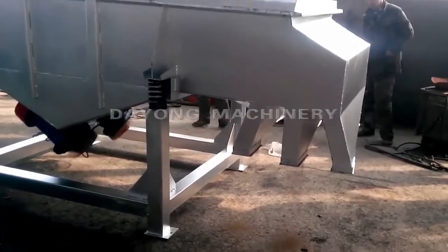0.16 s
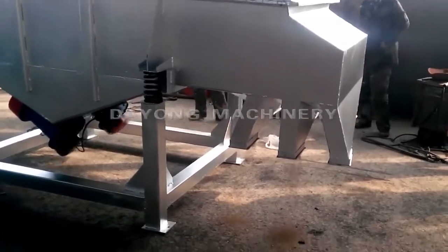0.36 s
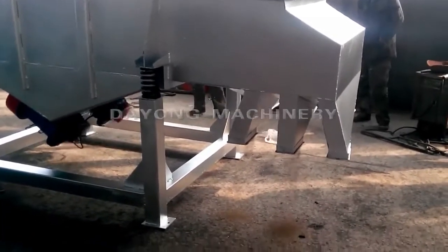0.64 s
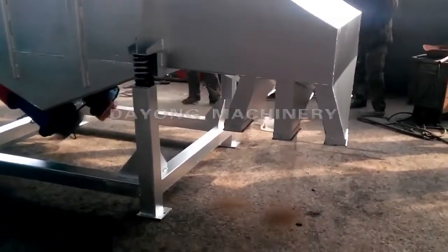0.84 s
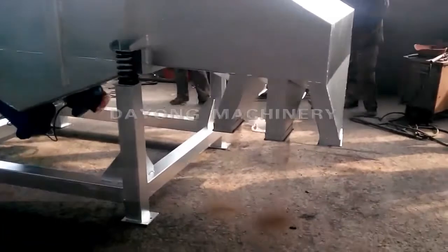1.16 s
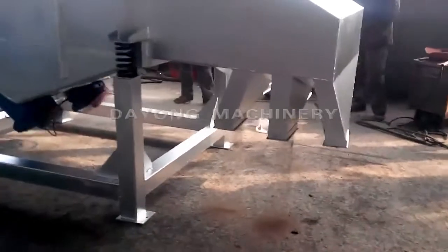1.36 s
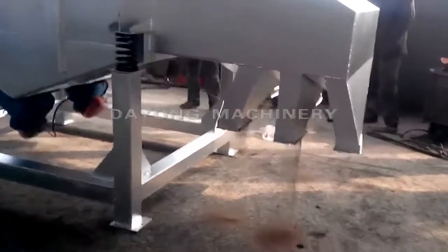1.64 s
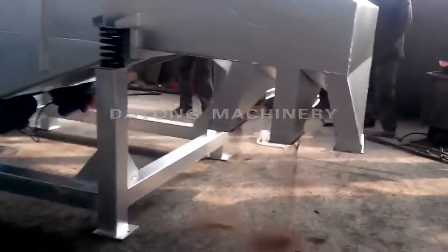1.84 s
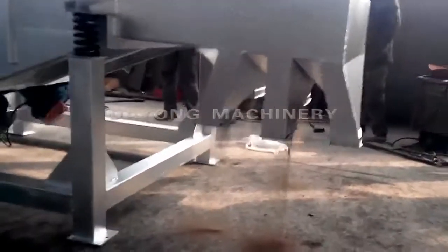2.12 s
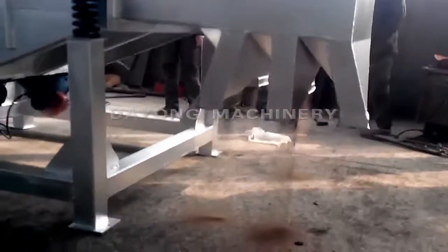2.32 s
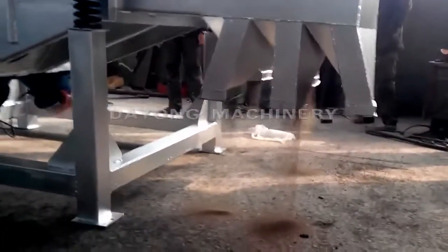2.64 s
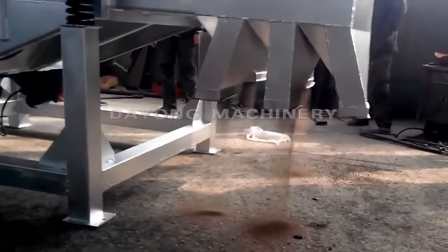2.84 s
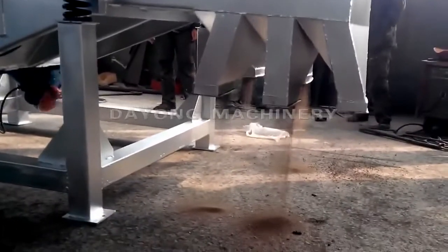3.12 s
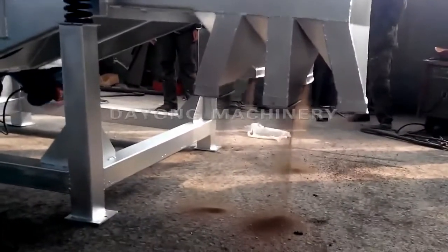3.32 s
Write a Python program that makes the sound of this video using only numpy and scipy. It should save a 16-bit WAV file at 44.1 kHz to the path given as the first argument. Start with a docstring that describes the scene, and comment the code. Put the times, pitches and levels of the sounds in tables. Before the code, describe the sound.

A large vibrating screen runs continuously in a workshop, grit hissing and rattling on its mesh over a deep throbbing hum; a hand-held phone moves closer, bass grows, and two tiny clicks come late.

```python
"""Grit rattles on the mesh of a large vibrating screen in a workshop: dense random hits and a wash of noise.
Its upper bands swell at each turn of the shaft, when the deck throws the grit up, and its level surges with the
load. Behind it the shaken steel box hums on multiples of the turn and rumbles as filtered noise, with narrow
motor bands. A hand-held phone walks slowly closer, heard as growing bass; two tiny clicks sound near the end."""
import sys
import numpy as np
from scipy import signal
from scipy.fft import rfft, irfft
from scipy.io import wavfile
from scipy.ndimage import uniform_filter1d

SR = 44100
rng = np.random.default_rng(int(sys.argv[2]) if len(sys.argv) > 2 else 0)


def gain_from_db(level_db):
    """Convert decibel levels to linear amplitude factors (20 dB per decade)."""
    decades = np.asarray(level_db, float) / 20
    return 10 ** decades


def store_pcm(level_fs):
    """Save levels as 16-bit WAV."""
    pcm = np.round(np.clip(level_fs, -1, 1) * 32767).astype(np.int16)
    wavfile.write(sys.argv[1], SR, np.atleast_2d(pcm).T)


N = 153468  # length in samples, about 3.5 s


def unit(x):
    """Scale to rms 1."""
    return x / np.sqrt(np.mean(x ** 2))


def bin_hz():
    """Frequency of every FFT bin in Hz."""
    return np.arange(N // 2 + 1) * SR / N


def over_hz(table):
    """Read a table of (Hz, value) at every FFT bin, along a logarithmic frequency scale."""
    table = np.array(table, float)
    return np.interp(np.log(bin_hz() + 1), np.log(table[:, 0]), table[:, 1])


def over_s(table, column=1):
    """Read one column of a table that starts with seconds, at every sample."""
    table = np.array(table, float)
    return np.interp(np.arange(N) / SR, table[:, 0], table[:, column])


def walk(rate_hz):
    """A smooth random drift with a spread near 1: new random levels at this rate, smoothed twice."""
    hold = int(SR / rate_hz)
    steps = np.repeat(rng.standard_normal(N // hold + 1), hold)
    smooth = uniform_filter1d(uniform_filter1d(steps, hold), hold)
    return 1.24 * smooth[:N]


def lowpass(x, hz):
    """Keep what lies below a frequency, without delaying it."""
    return signal.sosfiltfilt(signal.butter(2, hz, fs=SR, output="sos"), x)


# How different the two microphone ports sound.
# Each row: frequency in Hz, level of the side (left minus right) against the mid (their sum) in dB.
SIDE_WIDTH = [(60, -44), (180, -34.5), (320, -25.5), (560, -16.5), (700, -11.5), (800, -16.5), (970, -6),
              (1200, -10.5), (1900, -11), (2400, -9), (2970, -6.5), (5180, 0), (6400, 5), (9040, 5.5)]
# Which port is louder. Each row: frequency in Hz, left level minus right level in dB.
LEFT_LEAN = [(320, 0), (560, -.3), (970, -1.5), (1700, -.5), (2970, -3), (5180, -4.2), (6000, -3.5),
             (7000, 0)]


def ports(shared, apart, gain):
    """Colour two noises into left and right: one is common to both ports, one sets them apart; mid has rms 1."""
    left_late_s = 1e-5
    width = gain_from_db(over_hz(SIDE_WIDTH))
    # the part of the side that follows the mid: its real part makes one port louder
    lean = np.tanh(over_hz(LEFT_LEAN) * np.log(10) / 20) * (1 + width ** 2) / 2
    # its imaginary part makes the left port late
    lean = lean - 1j * np.minimum(np.pi * bin_hz() * left_late_s, width / 2)
    rest = np.sqrt(np.maximum(width ** 2 - np.abs(lean) ** 2, 0))
    mid_spectrum = rfft(shared) * gain
    side = irfft(lean * mid_spectrum + rest * rfft(apart) * gain, N)
    mid = irfft(mid_spectrum, N)
    return np.array([mid + side, mid - side]) / np.sqrt(np.mean(mid ** 2))


# Two tiny clicks. Each row: time in seconds, peak of left and right added together in dB, share on the left
# from 0 to 1.
TINY_CLICKS = [(2.4914, -19, .5), (3.0138, -24, .01)]


def clicks():
    """Two tiny clicks: each is a single sample, shared out between left and right."""
    out = np.zeros((2, N))
    for start_s, peak_db, left in TINY_CLICKS:
        out[:, int(start_s * SR)] = gain_from_db(peak_db) * np.array([left, 1 - left])
    return out


# Narrow bands of the motors. Each row: centre in Hz, width at half amplitude in Hz, rms level in dB.
MOTOR_TONES = [(127.6, 2.5, -35.5), (956.8, 14, -43), (533, 3.3, -46.5)]


def motors():
    """Bearing and rotor tones, blurred into narrow bands: noise through a sharp resonance for each."""
    out = 0
    for centre_hz, width_hz, level_db in MOTOR_TONES:
        resonance = 1 / (1 + (2 * (bin_hz() - centre_hz) / width_hz) ** 2)
        band = irfft(rfft(rng.standard_normal(N)) * resonance, N)
        out = out + gain_from_db(level_db) * unit(band)
    return out


# Colour of the box rumble. Each row: frequency in Hz, relative level in dB per Hz.
RUMBLE_COLOUR = [(12, -47), (20, -11), (38, -20), (151, -1), (367, -8.5), (431, -16.5), (728, -16),
                 (857, -29.5), (955, -27.5), (1140, -18.5), (1500, -18.5), (1950, -42), (3300, -120)]
# Loudness of the rumble. Each row: time in seconds, level in dB before a steady 2.5 dB cut.
RUMBLE_LOUDNESS = [(0, -24.5), (.1, -28), (.8, -23.5), (1.3, -26), (2, -24), (2.7, -24), (3.48, -23)]


def rumble(turns):
    """The panels of the box roar: coloured noise that throbs a little with the turn."""
    throb_db = 2 * np.cos(2 * np.pi * (turns - .35)) + 0.89 * walk(5.45)
    noise = gain_from_db(throb_db) * rng.standard_normal((2, N))
    roar = ports(noise[0], noise[1], gain_from_db(over_hz(RUMBLE_COLOUR)))
    return roar * gain_from_db(over_s(RUMBLE_LOUDNESS) - 2.5)


# Hum of the shaken box. Each row: multiple of the shaft turn, relative level in dB.
BOX_HUM = [(1, -22.5), (2, -29), (3, -13.5), (4, -21.5), (5, -4.5), (6, -9), (7, -8), (8, -10.5), (9, 1),
           (10, 1.5), (11, -17), (12, -8.5), (13, -7.5), (14, -3.5), (15, -10.5), (16, -8.5), (17, -7),
           (18, -11.5), (19, -8.5), (20, -16.5), (21, -19.5), (22, -7), (23, -19.5), (24, -17)]


def hum(turns):
    """The unbalanced shafts shake the box: sines at multiples of the turn, wavering in level and phase."""
    level_db, waver_db, waver_rad = -26.5, 2.74, 0.26
    out = 0
    for multiple, tone_db in BOX_HUM:
        phase = 2 * np.pi * (multiple * turns + rng.random()) + waver_rad * walk(2.58)
        out = out + gain_from_db(tone_db + waver_db * walk(2.98)) * np.sin(phase)
    return unit(out) * gain_from_db(level_db)


# How the bass grows as the phone nears. Each row: time in seconds, gain of the bass in dB.
NEARING_BASS = [(0, -0.5), (1.8, 0.5), (3.48, 3.5)]


def walk_closer(box):
    """Change the level of the bass, below about 110 Hz, as the phone nears the box."""
    return box + (gain_from_db(over_s(NEARING_BASS)) - 1) * lowpass(box, 110)


# The throw of the deck, once a turn.
# Each row: time in seconds, moment of the throw in turns, depth of the swell in dB before smoothing.
THROW_MOMENT = [(0, 0.94, 7), (.7, 0.98, 5.5), (.85, 1, 1), (1.1, .87, 5.5), (2.36, 0.99, 3.5),
                (2.5, 0.39, 3.5), (2.85, 0.63, 6), (2.95, 0.46, .5), (3.48, 0.54, 5)]
# Heavier lots of grit landing at once.
# Each row: start in seconds, lift in dB before smoothing, fade in seconds.
HEAVY_LOTS = [(2.396, 2.5, .03), (2.492, 3.5, .012), (2.563, 4.5, 0.025), (2.943, 6.5, 0.013),
              (3.01, 6, 0.026), (3.098, 2, 0.03), (3.152, 5, 0.023), (3.397, 3, 0.047)]


def throws(turns):
    """Lift in dB: a quick rise at each throw of the deck and at each heavy lot, then a fade."""
    fade_turns, rise_s = 1, 0.0043
    since_throw = (turns - over_s(THROW_MOMENT)) % 1
    pulse = np.exp(-since_throw / fade_turns)
    lift_db = over_s(THROW_MOMENT, column=2) * (pulse - pulse.mean()) / np.ptp(pulse)
    t = np.arange(N) / SR
    for start_s, lot_db, fade_s in HEAVY_LOTS:
        lift_db = lift_db + lot_db * (t >= start_s) * np.exp(-np.maximum(t - start_s, 0) / fade_s)
    return uniform_filter1d(lift_db, int(rise_s * SR))


# Colour of the grit on the mesh. Each row: frequency in Hz, relative level in dB per Hz.
GRIT_COLOUR = [(290, -17.5), (500, -8), (656, -7.5), (881, -9.5), (960, -5.5), (1010, -8.5), (1130, -11.5),
               (1370, -15.5), (1650, -5.5), (2220, -5), (2950, -0.5), (3460, 0), (4880, -1), (5730, -5.5),
               (7150, -20.5), (7890, -29), (9030, -32), (9490, -25), (12300, -75), (20900, -120)]
# Load on the mesh.
# Each row: time in seconds, grit level in dB, extra level of the band below about 1.7 kHz in dB.
GRIT_LOAD = [(0, -24, 6), (.2, -22, 2), (.28, -21.5, 2.5), (.45, -20, 1.5), (.6, -22, 2), (.7, -21.5, -1.5),
             (.76, -16, 1), (.86, -19.5, 6.5), (.94, -17.5, 1.5), (1.02, -19.5, 3.5), (1.2, -21.5, 4),
             (1.7, -22, 1.5), (2.05, -19.5, -1), (2.3, -20, -1.5), (2.56, -20.5, -1.5), (2.7, -20, -3),
             (2.93, -20.5, -1), (2.95, -18.5, -2.5), (3.05, -18.5, -5), (3.09, -20, -2), (3.19, -20, -1.5),
             (3.24, -14, -4), (3.33, -20, -1.5), (3.37, -17.5, -7), (3.48, -19, 1)]


def grit(turns):
    """Dense grain hits and their wash in the shed; the two upper bands swell at throws, every band flickers."""
    grains_per_s, grain_spread_db, wash_db = 9000, 2.5, 2.5  # the wash is set against the hits
    wander_db, flicker_db = .5, .35
    throw_db = throws(turns)
    # a few grains hit much harder than most
    struck = rng.random((2, N)) < grains_per_s / SR
    force = gain_from_db(grain_spread_db * np.minimum(rng.exponential(size=(2, N)), 4.5))
    push_or_pull = np.sign(rng.standard_normal((2, N)))
    hits = unit(struck * force * push_or_pull)
    rattle = hits + gain_from_db(wash_db) * rng.standard_normal((2, N))
    both = ports(rattle[0], rattle[1], gain_from_db(over_hz([(250, -81)] + GRIT_COLOUR)))

    below_1700, below_3800 = lowpass(both, 1700), lowpass(both, 3800)
    shared_db = over_s(GRIT_LOAD) + wander_db * walk(11.06)
    bands = [(below_1700, shared_db + over_s(GRIT_LOAD, column=2)),
             (below_3800 - below_1700, shared_db + throw_db),
             (both - below_3800, shared_db + throw_db)]
    out = 0
    for band, level_db in bands:
        flicker = flicker_db * (walk(9.51) + walk(29.67))
        out = out + band * gain_from_db(level_db + flicker)
    return out


def scene():
    """The screen, near and in front: box and grit follow the same slightly uneven shaft turn."""
    shaft_hz = 16.62
    turns = np.cumsum(shaft_hz * (1 + 0.00089 * walk(1.29))) / SR
    box = motors() + rumble(turns) + hum(turns)
    return walk_closer(box) + grit(turns)


def top_cut(x):
    """Nothing passes above the cut-off."""
    return signal.sosfilt(signal.butter(12, 15800, fs=SR, output="sos"), x)


def record(dry):
    """The phone rounds the highest peaks and cuts the top above 9400 Hz; the clicks skip both."""
    rounded = np.tanh(dry)
    cut = signal.sosfilt(signal.ellip(12, .2, 90, 9400, fs=SR, output="sos"), rounded)
    return top_cut(cut + clicks())


dry = scene()
out = record(dry)
store_pcm(out)
```